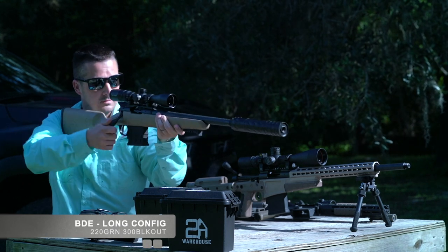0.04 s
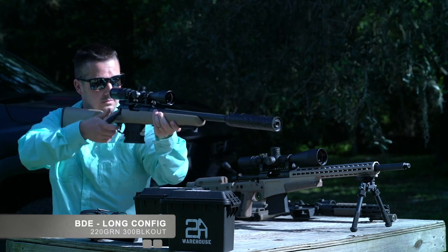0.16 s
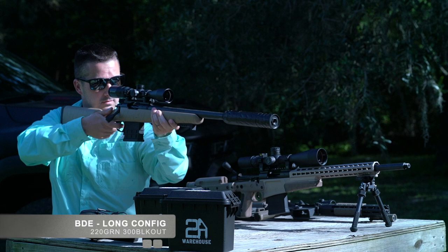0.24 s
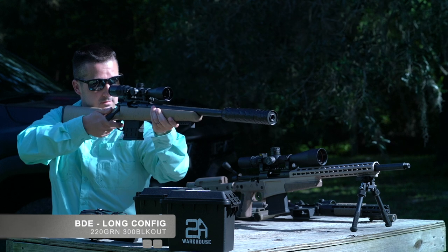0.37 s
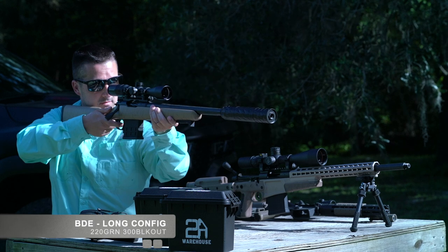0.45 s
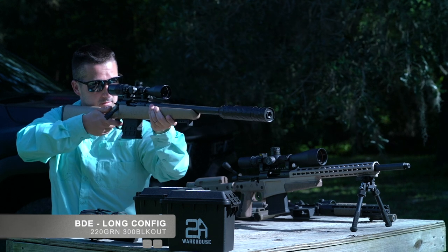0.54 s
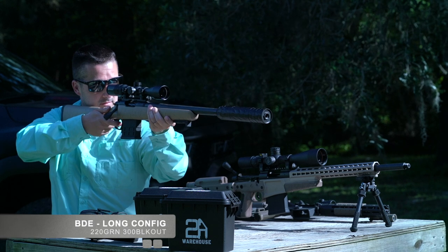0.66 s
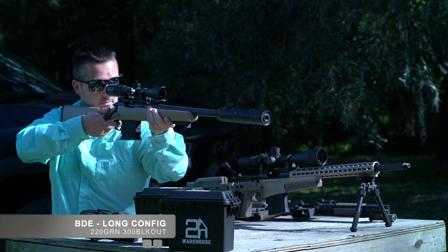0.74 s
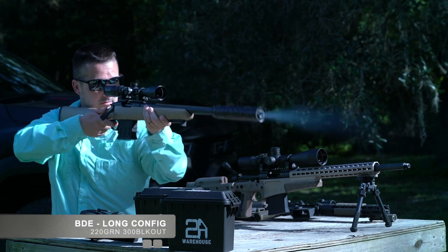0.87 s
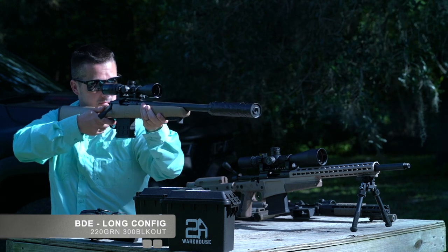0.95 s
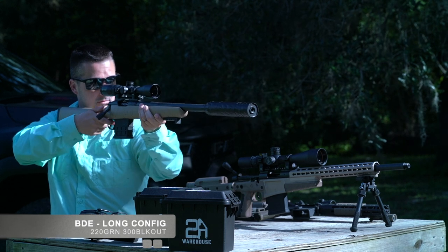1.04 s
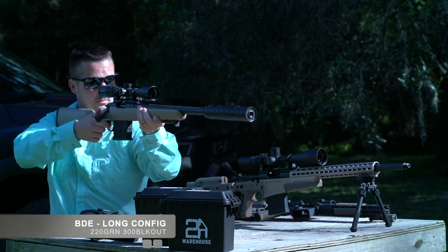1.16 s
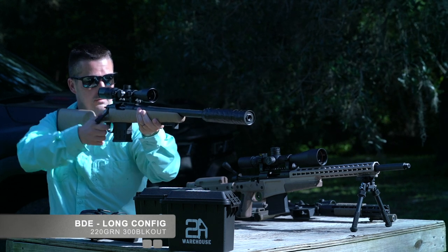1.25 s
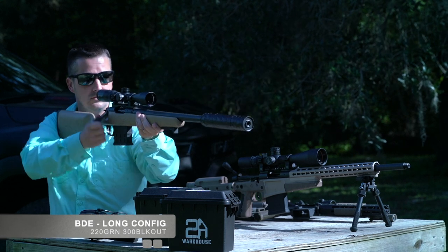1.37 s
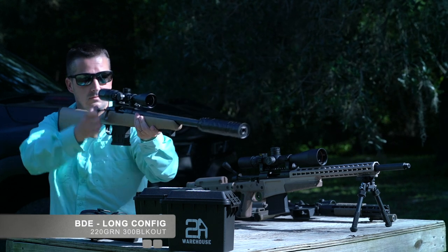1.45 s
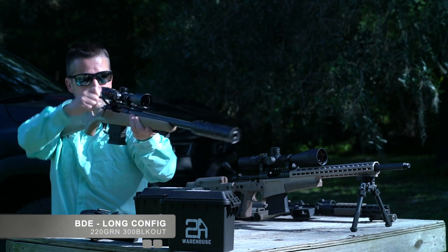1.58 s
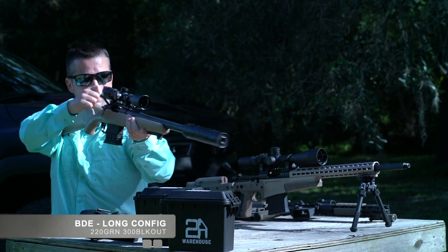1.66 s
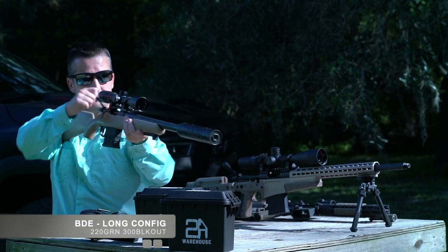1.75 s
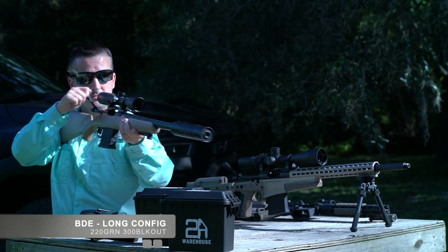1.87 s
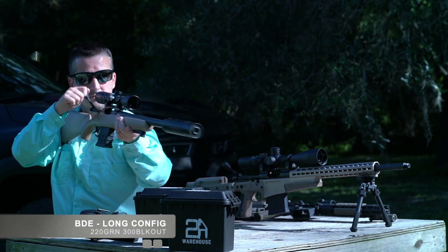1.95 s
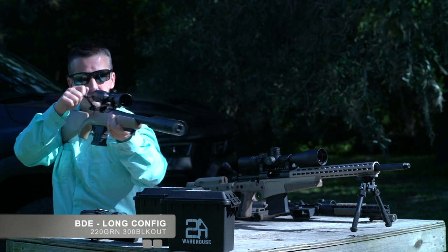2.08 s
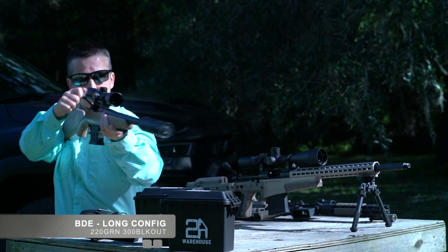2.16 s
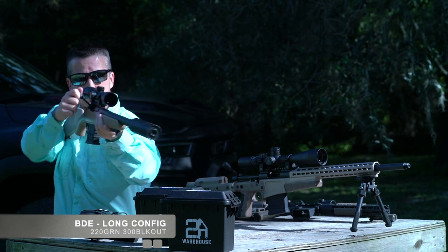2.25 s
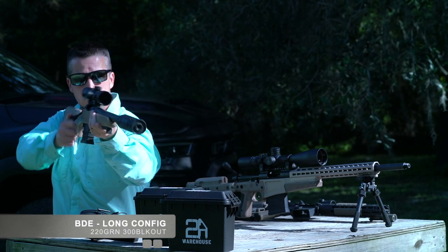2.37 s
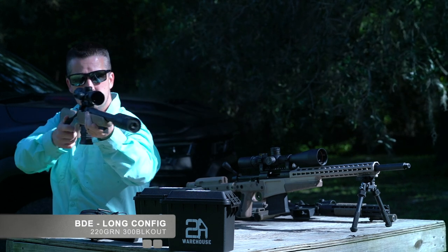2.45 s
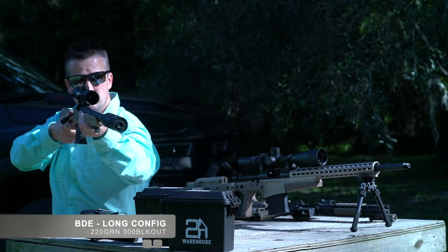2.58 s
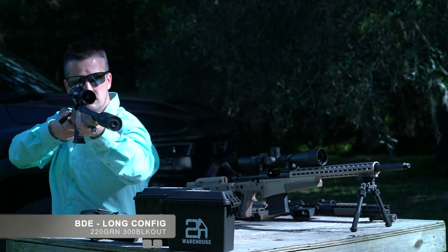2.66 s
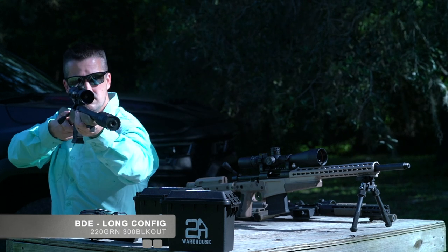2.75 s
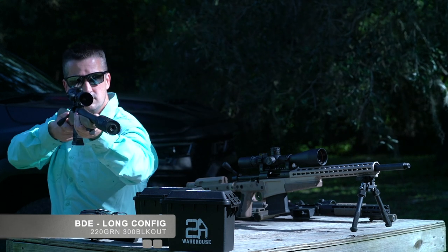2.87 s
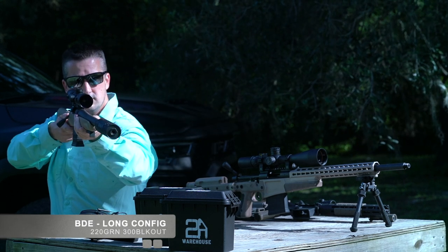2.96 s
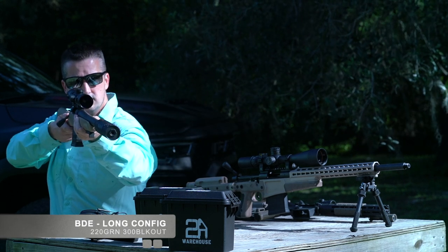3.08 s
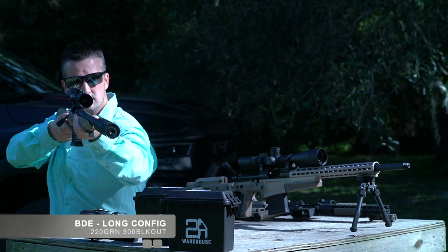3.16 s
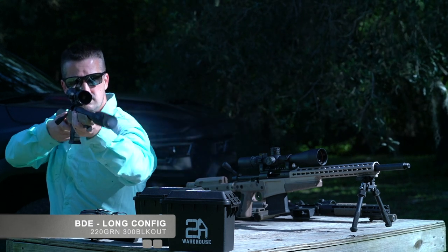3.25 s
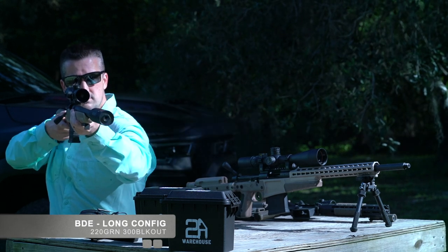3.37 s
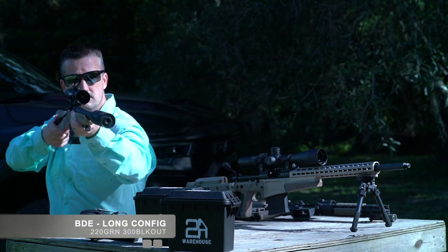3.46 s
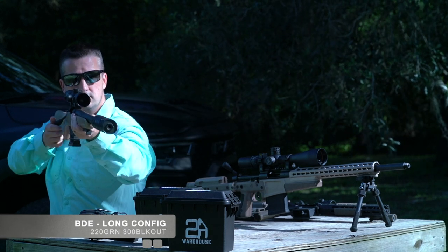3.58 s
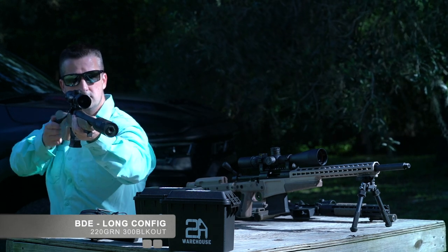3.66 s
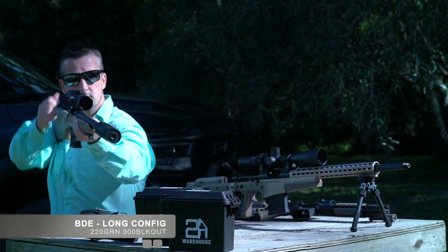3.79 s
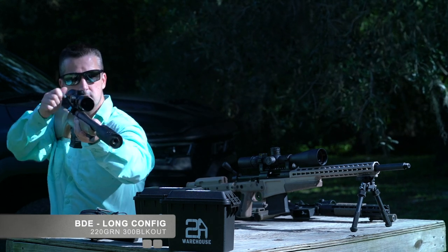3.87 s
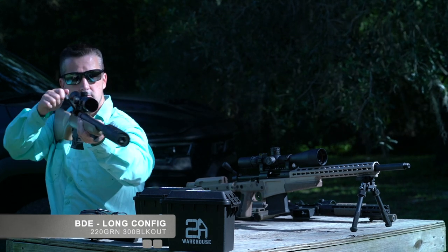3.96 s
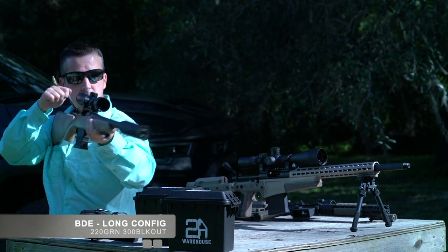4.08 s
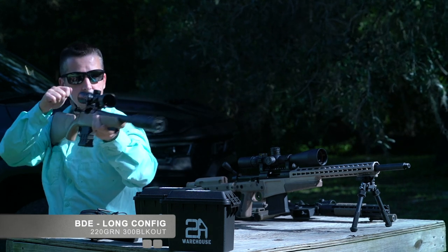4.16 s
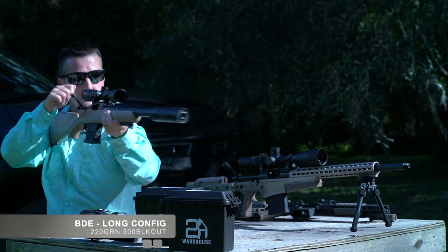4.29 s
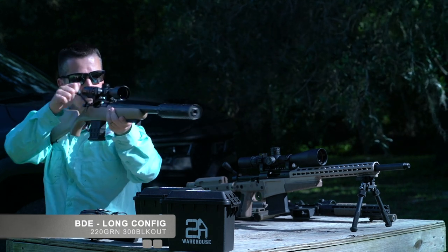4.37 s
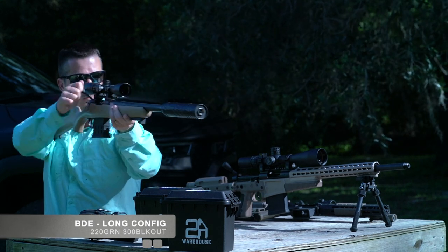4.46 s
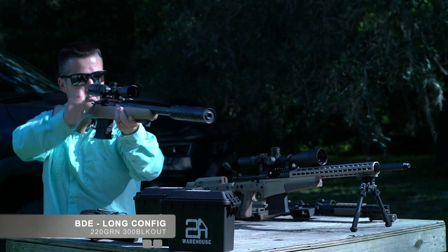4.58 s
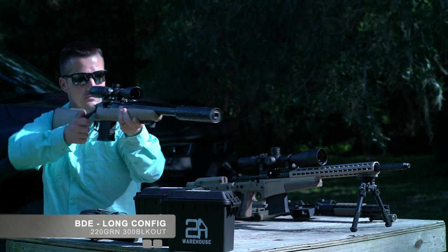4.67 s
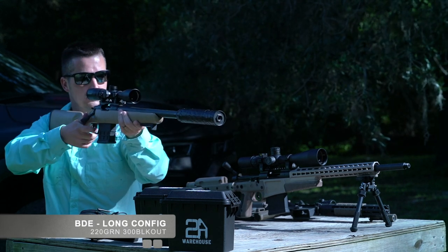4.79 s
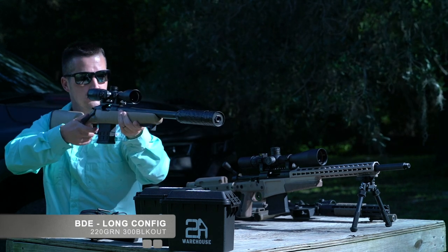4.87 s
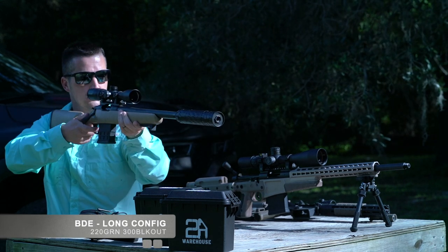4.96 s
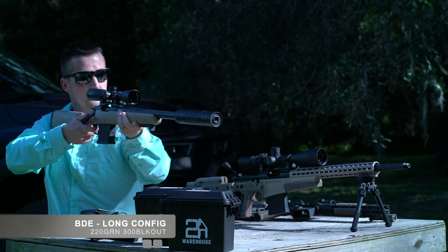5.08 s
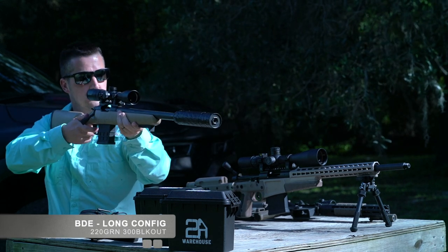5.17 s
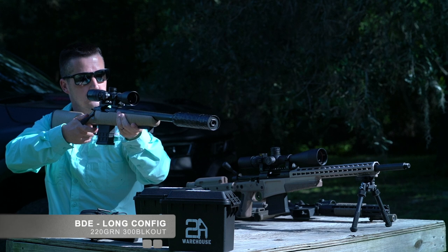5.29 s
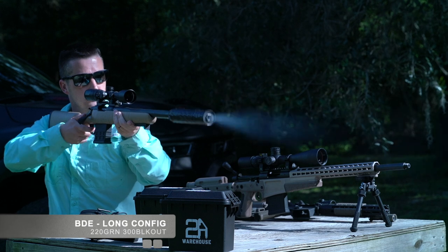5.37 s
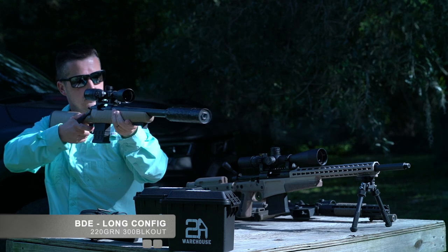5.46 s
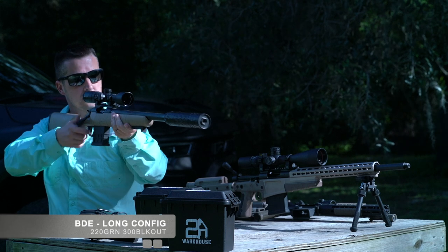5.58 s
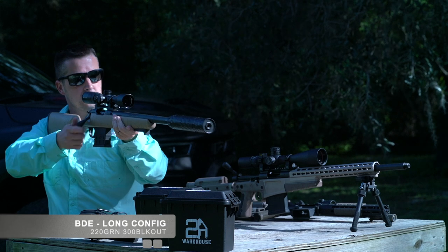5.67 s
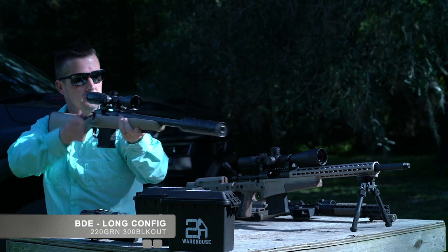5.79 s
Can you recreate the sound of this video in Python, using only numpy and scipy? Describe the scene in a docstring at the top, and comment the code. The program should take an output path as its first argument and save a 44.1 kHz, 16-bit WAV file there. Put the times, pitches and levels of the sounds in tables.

```python
"""Suppressed rifle on a tree-ringed range

A suppressed bolt-action rifle fires three shots outdoors: each is a pressure pulse and a hiss of vented gas
that overload the microphone. The bullets crack and thud downrange, and the trees return diffuse noise.
Between shots the bolt is lifted, drawn, run home and locked: resonant knocks, with noise grains for scrapes.
Low-frequency noise forms the light air, and a narrow steady band the far insects."""
import sys
import numpy as np
from scipy import signal
from scipy.fft import rfft, irfft, next_fast_len
from scipy.io import wavfile

SR = 44100
rng = np.random.default_rng(int(sys.argv[2]) if len(sys.argv) > 2 else 0)


def to_wav(sig):
    """Store sig (one row per channel, or 1-D mono) as 16-bit WAV at the path in sys.argv[1].

    Samples outside -1..1 are clipped; the rate is SR.
    """
    pcm = np.clip(np.atleast_2d(sig), -1, 1) * 32767
    pcm = np.round(pcm).astype(np.int16)
    wavfile.write(sys.argv[1], SR, pcm.T)  # frames by channels


N = 257103
TIME = np.arange(N) / SR

# Moving air on the microphone, spectrum: f/Hz, relative level/dB
RUMBLE_SPECTRUM = [(15, -6), (35, 1.5), (70, 1), (130, -4), (220, -11), (450, -19.5), (1000, -30),
                   (3000, -51)]
# Breeze that blows, then drops to a lull: t/s, level/dB
BREEZE_LEVELS = [(0, -62), (2.1, -62), (2.3, -66.5), (5.83, -68.5)]
# Gusts on top of the breeze: peak t/s, half length/s, added level/dB
GUST_PEAKS = [(1.526, 0.22637, 4), (2.11, .06, 9)]
# Far hush, spectrum: f/Hz, relative level/dB
HUSH_SPECTRUM = [(20, -7.5), (100, 1.5), (350, 3), (750, -4), (1200, -11.5), (2200, -17), (5000, -20.5),
                 (9500, -20.5), (12000, -24), (16000, -28.5)]
# Far insects, spectrum: f/Hz, relative level/dB
INSECT_SPECTRUM = [(5500, -46.5), (7000, -16), (7550, -3.5), (7850, -0.5), (8150, -4.5), (8600, -17),
                   (11000, -45.5)]

# Broad colour of the rifle's action: f/Hz, relative level/dB
ACTION_SPECTRUM = [(150, -26.5), (400, -6.5), (620, -6), (800, -1.5), (1300, 0), (2500, -1.5), (4000, -2.5),
                   (7000, -4), (10000, -10), (13000, -13.5), (16000, -18.5)]
# Resonances of the action: f/Hz, width/Hz, relative level/dB
ACTION_MODES = [(666.76, 154.76, 9.5), (1041.4, 56.45, 9), (1310.8, 63.42, 6), (1848.6, 110, 6.5),
                (2363.7, 255, 2.5), (2718.7, 63.83, 8.5), (3143, 170, -2), (3793.2, 55.36, 2),
                (6077.6, 199.6, 2.5), (7116.3, 56, 3), (8853.2, 54.5, 6), (12046, 210, -7)]
# Light knocks of gripping and shouldering: t/s, then relative level/dB of stock, receiver, bright steel
HANDLING_KNOCKS = [(0.002, -52.5, -51, -59.5), (0.132, -61.5, -65, -61.5), (0.548, -80, -70, -78),
                   (0.612, -74, -54, -59), (1.449, -54, -59.5, -65), (1.74, -78, -61, -75),
                   (2.616, -58, -67.5, -74), (3.757, -58, -53.5, -64), (3.803, -54, -62.5, -76),
                   (3.826, -56.5, -49, -60.5), (3.898, -64.5, -59.5, -64.5), (3.906, -65.5, -56, -60.5),
                   (3.926, -66, -58.5, -74), (4.82, -57, -61, -72)]

# Bolt strokes, two of each kind: start t/s, stop t/s, force/dB, brightness/dB
# handle lifted
LIFT_TIMES = [(1.611, 1.6315, -1, 1.5), (3.857, 3.881, -5.5, 6)]
# bolt drawn back
DRAW_TIMES = [(1.785, 1.868, 0, 0), (4.011, 4.112, -1, -1)]
# bolt run home
PUSH_TIMES = [(2.136, 2.2225, -0.5, 0.5), (4.39, 4.4837, -1.5, 1)]
# handle turned down
LOCK_TIMES = [(2.345, 2.42, -1, 0.5), (4.624, 4.696, 0, -.5)]

# Contacts along a stroke: share of the stroke/1, then relative level/dB of stock, receiver, bright steel
# lift: lugs unseat, cocking cam tops out
LIFT_KNOCKS = [(0, -77, -52.5, -54), (0.998, -46, -42, -41.5)]
# draw: start, case pulls free, ejector, rear stop
DRAW_KNOCKS = [(0, -74, -56.5, -63.5), (0.292, -75.5, -47.5, -47.5), (0.818, -42.5, -41, -41),
               (1, -42.5, -35, -39)]
# push: start, round met, round stripped, bolt home
PUSH_KNOCKS = [(0, -56, -84.5, -46.5), (0.354, -63, -44.5, -45.5), (.53, -51.5, -43, -45),
               (1, -60.5, -30.5, -33.5)]
# lock: start, lugs engage, handle down
LOCK_KNOCKS = [(0, -65.5, -56, -61.5), (0.212, -65.5, -52.5, -54), (1, -45, -45, -45.5)]

# Scrapes along the lift: from share/1, to share/1, relative level at the end/dB
LIFT_RASPS = [(0.451, 1.114, -50)]
# Scrapes along the draw: same columns, share/1, share/1, level/dB
DRAW_RASPS = [(0.118, 0.366, -51.5), (0.652, 0.892, -47)]
# Scrapes along the push: same columns, share/1, share/1, level/dB
PUSH_RASPS = [(.04, .62, -48), (0.619, 1.1, -47.5)]
# Scrapes along the lock: same columns, share/1, share/1, level/dB
LOCK_RASPS = [(0.665, 1.254, -63)]

# Each kind of stroke meets the same contacts and scrapes, faster or slower: times, contacts, scrapes
BOLT_STROKES = [
    (LIFT_TIMES, LIFT_KNOCKS, LIFT_RASPS),
    (DRAW_TIMES, DRAW_KNOCKS, DRAW_RASPS),
    (PUSH_TIMES, PUSH_KNOCKS, PUSH_RASPS),
    (LOCK_TIMES, LOCK_KNOCKS, LOCK_RASPS),
]

# Faint rings of loose metal and cartridge cases: t/s, f/Hz, width/Hz, level/dB, t60/s
LOOSE_RINGS = [(0.003, 1371, 50, -53, .05), (0.613, 680, 14, -60, 0.4721), (3.857, 1931, 160, -55, 0.11882),
               (3.895, 1190, 200, -59.5, .2), (4.073, 9081, 250, -57, 0.1746),
               (4.391, 6030, 250, -51, .092)]
# Scrapes of the hands on the rifle: start t/s, length/s, relative level at the start/dB
HAND_RUBS = [(0.004, 0.1225, -67), (0.625, 0.05326, -64), (2.108, 0.06784, -64.5), (4.697, 0.04561, -62.5)]

# Scatter from bench, gear and vehicle: f/Hz, relative level/dB, t60/s, left-right correlation/1
BENCH_SCATTER = [(100.74, -21, 0.12, 0.55), (500, -17, .15, 0.73), (2000, -15.5, .14, .3),
                 (6000, -16, 0.089, -0.49), (15000, -14, 0.058, -.5)]
# Wash from the trees: f/Hz, relative level/dB, t60/s, left-right correlation/1
TREE_WASH = [(100, -33, 0.72, .9), (300, -31, 0.56, 0.65), (821, -26, 0.97927, .75), (1600, -25, 0.94, .55),
             (3200, -21.5, 0.82, 0.086), (6500, -22, 0.72, -0.045), (10000, -22, .65, -.1),
             (15000, -20.5, 0.33, -0.4)]

# Shots: t/s, pulse level/dB, pulse length/s, bass edge f/Hz, gas spurt level/dB, blow-down level/dB,
# hold/s, blow-down t60/s, level of the broad mid roar near 1.9 kHz/dB, level sent to the trees/dB
SHOT_BLASTS = [(0.8945, 0, 0.0007, 260, 1.5, -8.5, 0.008525, 0.082, -29, -1.5),
               (3.2578, 0.5, 0.0014318, 105.8, -1, -14.5, 0.017381, 0.05219, 16, 6),
               (5.3918, 6, 0.00045, 25, 2.5, -8.5, 0.012505, 0.06466, 6.5, -1)]
# Vented gas, spectrum: f/Hz, relative level/dB
GAS_SPECTRUM = [(100, -22.5), (330, -11), (470, -26), (700, -12), (950, -10), (1500, -15), (2200, -12.5),
                (3200, -4.5), (4200, -0.5), (6800, -1), (10000, 0), (12000, -6.5), (15500, -8.5)]
# Suppressor tube resonances: f/Hz, width/Hz, relative level/dB
TUBE_MODES = [(836.1, 29, 1), (1220, 130, 5), (1798, 50, 1.5), (3302, 55, 4.5), (4240, 90, -3),
              (4502, 28, -2.5), (5612, 60, -5), (6931, 80, 2.5), (8038, 170, -4), (8350, 160, -2),
              (9940, 80, -0.5)]
# Bullet strikes, the second bullet three times:
# t/s, crack level/dB, crack top f/Hz, thud level/dB, final thud f/Hz
BULLET_STRIKES = [(0.9677, -27.5, 2550, -30, 136), (3.339, -27.5, 1905, -46, 258.7),
                  (3.3573, -24.5, 6104, -42, 258.4), (3.3624, -31.5, 2000, -32.5, 181.4),
                  (5.471, -39, 2000, -35, 121.4)]

# The stop that ends a stroke is the tightest contact
CONTACT_T60_S, STOP_T60_S, HANDLING_T60_S = 0.0402, 0.02159, 0.023847
SCRAPE_SWELL_DB = 2  # a scrape grows as the bolt gathers speed
CATCHES_PER_S, CATCH_T60_S = 2000, .022
GROUND_LAG_S = .00342
THUD_CYCLES = 8.072  # a thud falls by 60 dB within this many cycles of its final pitch
DEBRIS_S, DEBRIS_DB = .026, -13  # thrown earth falls back within this time, this much softer
CUTOFF_HZ = 16200


def from_db(db):
    """Amplitude ratio from level: 20 dB per factor of ten."""
    return 10 ** (np.asarray(db) / 20)


def rms_one(x):
    """Normalisation to unit root-mean-square amplitude."""
    return x / np.sqrt(np.mean(x ** 2) + 1e-20)


def at_hz(points, hz, axis=1):
    """Linear interpolation of a table column along logarithmic frequency."""
    table = np.array(points)
    return np.interp(np.log(np.maximum(hz, 1)), np.log(table[:, 0]), table[:, axis])


def cut(x, hz, kind, order=2):
    """Causal Butterworth filtering: low-, high- or band-pass."""
    edges = np.clip(hz, 10, .45 * SR)
    return signal.sosfilt(signal.butter(order, edges, kind, fs=SR, output="sos"), x + 1e-18)


def noise(spectrum, modes=(), size=N):
    """Spectral shaping: white noise takes a broad colour and Lorentzian resonances, at unit rms."""
    count = next_fast_len(size)
    hz = np.arange(count // 2 + 1) * SR / count
    peak_power = 1 + sum(from_db(db) ** 2 / (1 + (2 * (hz - f) / width) ** 2) for f, width, db in modes)
    gain = from_db(at_hz(spectrum, hz)) * np.sqrt(peak_power)
    white = rfft(rng.standard_normal(count))
    return rms_one(irfft(white * gain, count)[:size])


def stereo(mid, side, likeness):
    """Mid-side superposition: unrelated signals combine to a pair of given correlation."""
    c = np.clip(likeness, -1, 1)
    return np.sqrt((1 + c) / 2) * mid + np.sqrt((1 - c) / 2) * side * np.array([[1], [-1]])


def fade(t, t60):
    """Exponential decay: full until t = 0, then falling by 60 dB in t60."""
    return from_db(-60 * np.maximum(t, 0) / max(t60, 1e-4))


def delayed(x, s):
    """Propagation delay: the same signal s seconds later."""
    return np.interp(TIME - s, TIME, x, left=0)


def add(track, s, sound):
    """Linear superposition of a sound on a track from time s."""
    at = int(round(s * SR))
    track[at:at + len(sound)] += sound[:N - at]


def drift(rate):
    """Slow random modulation: normal deviates, rate per second, joined by straight lines."""
    knots = rng.standard_normal(int(rate * N / SR) + 2)
    return np.interp(TIME * rate, np.arange(len(knots)), knots)


def outdoors(still_db=-69.0, insects_db=-80.0):
    """Stationary ambient noise: far hush and insects hold steady while breeze and gusts modulate the rumble."""
    gusts = sum(db * np.exp(-((TIME - s) / half_s) ** 2) for s, half_s, db in GUST_PEAKS)
    air_db = np.interp(TIME, *np.transpose(BREEZE_LEVELS)) + gusts
    rumble = from_db(air_db) * stereo(noise(RUMBLE_SPECTRUM), noise(RUMBLE_SPECTRUM), .3)
    hush = from_db(still_db) * stereo(noise(HUSH_SPECTRUM), noise(HUSH_SPECTRUM), 0.44)
    insects = from_db(insects_db) * stereo(noise(INSECT_SPECTRUM), noise(INSECT_SPECTRUM), 0.09)
    return rumble + hush + insects


def contacts():
    """Contact sequence scaled to each stroke, a brighter one trading stock for steel: t/s, three level/dB, t60/s."""
    rows = [(*knock, HANDLING_T60_S) for knock in HANDLING_KNOCKS]
    for strokes, pattern, _ in BOLT_STROKES:
        for start, stop, force, bright in strokes:
            for k, (share, stock, receiver, steel) in enumerate(pattern, 1):
                s = start + share * (stop - start)
                t60 = STOP_T60_S if k == len(pattern) else CONTACT_T60_S
                rows.append((s, stock + force - bright, receiver + force, steel + force + bright, t60))
    return rows


def knocks(force_db=0.6641, stock_hz=1000, steel_hz=3500, rise_s=0.000739, variety_db=0.4359,
           ring_db=-21, ring_t60=0.1343):
    """Modal excitation: a tight rattle in the hand-damped action stirs each resonance to its own strength."""
    out, t = np.zeros(N), TIME[:SR // 6]
    for s, *levels, t60 in contacts():
        modes = [(hz, width, db + variety_db * rng.standard_normal()) for hz, width, db in ACTION_MODES]
        stock, receiver, steel = (noise(ACTION_SPECTRUM, modes, size=len(t)) for _ in levels)
        parts = (cut(stock, stock_hz, "low", order=4),
                 cut(receiver, [stock_hz, steel_hz], "band"),
                 cut(steel, steel_hz, "high"))
        rattle = sum(from_db(db + force_db) * rms_one(part) for db, part in zip(levels, parts))
        contact = (1 - np.exp(-t / rise_s)) * fade(t, t60)
        # the steel rings on faintly once the contact is over
        ring = np.zeros(len(t))
        for hz, width, db in modes:
            pitch_hz = hz + width * rng.uniform(-0.5001, 0.4909)
            ring += from_db(db + at_hz(ACTION_SPECTRUM, hz)) * np.sin(2 * np.pi * pitch_hz * t)
        tail = from_db(max(levels) + ring_db) * rms_one(ring) * fade(t, ring_t60)
        add(out, s, rattle * contact / contact.max() + tail)
    return out


def rings(swell_share=.07):
    """Narrow-band resonance: loose parts swell into a brief buzz of wavering pitch and decay."""
    out, t = np.zeros(N), TIME[:SR]
    for s, hz, width, db, t60 in LOOSE_RINGS:
        swell_s = swell_share * t60
        # the first second lets the filter settle
        band = cut(rng.standard_normal(2 * SR), [hz - width / 2, hz + width / 2], "band")
        buzz = rms_one(band[SR:])
        envelope = np.sqrt(np.clip(t / swell_s, 0, 1)) * fade(t - swell_s, t60)
        add(out, s, from_db(db) * buzz * envelope)
    return out


def slides(level_db=-1):
    """Friction as random small catches: the bolt scrapes its raceway; hands rub more softly and trail off."""
    pressure = np.zeros(N)
    for strokes, _, scrapes in BOLT_STROKES:
        for start, stop, force, _ in strokes:
            travel_s = stop - start
            for begin, end, db in scrapes:
                swell = np.linspace(-SCRAPE_SWELL_DB, 0, max(int((end - begin) * travel_s * SR), 2))
                add(pressure, start + begin * travel_s, from_db(force + db + swell))
    for start, length, db in HAND_RUBS:
        add(pressure, start, from_db(db) * np.linspace(1, 0, max(int(length * SR), 2)))
    catches = (rng.random(N) < CATCHES_PER_S / SR) * rng.exponential(1, N)
    grain = rms_one(signal.lfilter([1], [1, -fade(1 / SR, CATCH_T60_S)], catches))
    return from_db(level_db) * pressure * grain * noise(ACTION_SPECTRUM, ACTION_MODES)


def ground(x, share, dull_hz):
    """Ground reflection: the grass returns a duller copy just after the direct sound."""
    return x + share * delayed(cut(x, dull_hz, "low", order=1), GROUND_LAG_S)


def nearby(x, spread_db=-9, t60=0.0032, low_hz=9000, pan_db=0.5866):
    """Interchannel difference: the two capsules hear the treble differently, the left a little louder."""
    t = TIME[:SR // 50]
    paths = rng.standard_normal(len(t)) * fade(t, t60)
    spread = signal.fftconvolve(x, paths / np.linalg.norm(paths))[:N]
    side = from_db(spread_db) * cut(spread, low_hz, "high", order=1)
    return from_db([[pan_db], [-pan_db]]) * x + side * np.array([[1], [-1]])


def linger(power, t60):
    """Energy storage: power builds up and leaks away by 60 dB in t60."""
    keep = fade(1 / SR, t60) ** 2
    return signal.lfilter([1 - keep], [1, -keep], power + 1e-18)


def wash(x, table, build_t60, patchy_db):
    """Diffuse reverberation: each band's power builds up, lingers and returns unevenly as noise."""
    edges, out = np.geomspace(60, 17000, num=17), 0
    white = rng.standard_normal((2, 2, N))  # neighbouring bands get unrelated noise
    clumps = drift(90)  # bunches of echoes, common to all bands
    for band, (low, high) in enumerate(zip(edges, edges[1:])):
        centre_hz = np.sqrt(low * high)
        db, t60, likeness = (at_hz(table, centre_hz, axis=k) for k in range(1, 4))
        power = linger(linger(cut(x, [low, high], "band") ** 2, t60), build_t60)
        mid, side = rms_one(cut(white[band % 2], [low, high], "band"))
        level = from_db(db + patchy_db * (drift(9.8) + 0.87 * clumps))
        out = out + level * np.sqrt(power) * stereo(mid, side, likeness)
    return out


def muzzle(pulse_db, pulse_s, bass_hz, spurt_db, blow_db, hold_s, blow_t60, roar_db,
           spurt_t60=.016, roar_hz=1920, roar_width_hz=420):
    """Blast wave and jet noise: overpressure with its suction, a spurt of gas, then the baffles emptying."""
    t = TIME[:SR // 5]
    pulse = cut((1 - t / pulse_s) * np.exp(-t / pulse_s), bass_hz, "high")
    spurt = from_db(spurt_db) * fade(t, spurt_t60)
    blow_down = from_db(blow_db) * (1 - np.exp(-t / 0.0023)) * fade(t - hold_s, blow_t60)
    hiss = noise(GAS_SPECTRUM, [*TUBE_MODES, (roar_hz, roar_width_hz, roar_db)], size=len(t))
    return from_db(pulse_db) * pulse + (spurt + blow_down) * hiss


def strikes(sag=1.8626, sag_s=0.0033155, crack_t60=0.012376, count=2):
    """Impact radiation: a crack, a thud sinking in pitch as the hole opens, and a few softer clods."""
    out, t = np.zeros(N), TIME[:SR // 6]
    for s, crack_db, top_hz, thud_db, thud_hz in BULLET_STRIKES:
        phase = 2 * np.pi * np.cumsum(thud_hz * (1 + sag * np.exp(-t / sag_s))) / SR
        thud = from_db(thud_db) * np.sin(phase) * fade(t, THUD_CYCLES / thud_hz)
        clods = [(DEBRIS_S * (k + rng.random()) / count, DEBRIS_DB) for k in range(count)]
        for late, db in [(0, 0), *clods]:
            crack = rms_one(cut(rng.standard_normal(len(t)), top_hz, "low")) * fade(t, crack_t60)
            add(out, s + late, from_db(db) * (from_db(crack_db) * crack + thud))
    return out


def scene():
    """Superposition: rifle close by and a little left, strikes far off, all washed back by the surroundings."""
    shots, outward = np.zeros(N), np.zeros(N)
    for s, *blast, trees_db in SHOT_BLASTS:
        shot = muzzle(*blast)
        add(shots, s, shot)
        add(outward, s, from_db(trees_db) * shot)
    bolt = knocks() + slides() + rings()
    far = strikes()
    close = ground(shots, share=0.56, dull_hz=2380) + ground(bolt, share=.3, dull_hz=2496)
    scatter = wash(shots + from_db(0.5) * bolt, BENCH_SCATTER, build_t60=0.0092, patchy_db=2.2134)
    to_trees = outward + from_db(5.0) * bolt + from_db(19.5) * far
    trees = wash(to_trees, TREE_WASH, build_t60=0.13, patchy_db=0.1478)
    return nearby(close) + far + scatter + trees + outdoors()


def record(dry, top=0.9385):
    """Amplitude saturation and band limiting: the shots flatten near full scale, and the top is cut."""
    clipped = dry / (1 + (dry / top) ** 8) ** (1 / 8)
    # order 10, 0.1 dB ripple, 70 dB stop-band attenuation
    lowpass = signal.ellip(10, .1, 70, CUTOFF_HZ, fs=SR, output="sos")
    return signal.sosfilt(lowpass, clipped)


dry = scene()
out = record(dry)
to_wav(out)
```